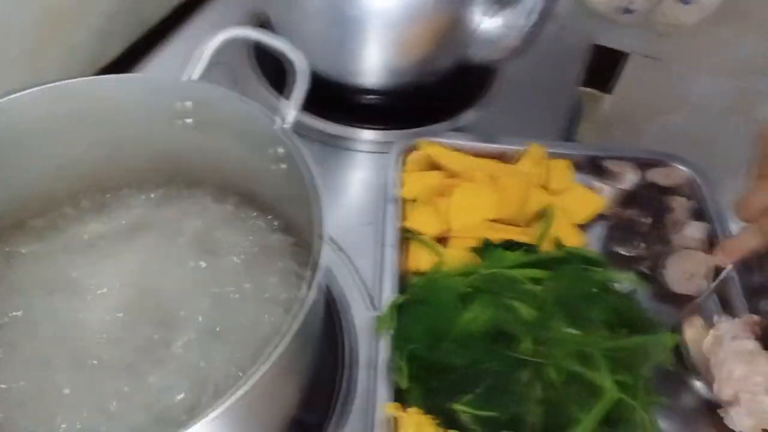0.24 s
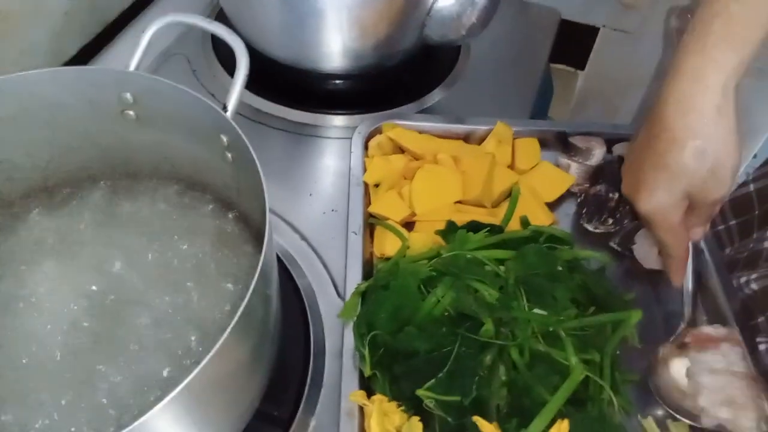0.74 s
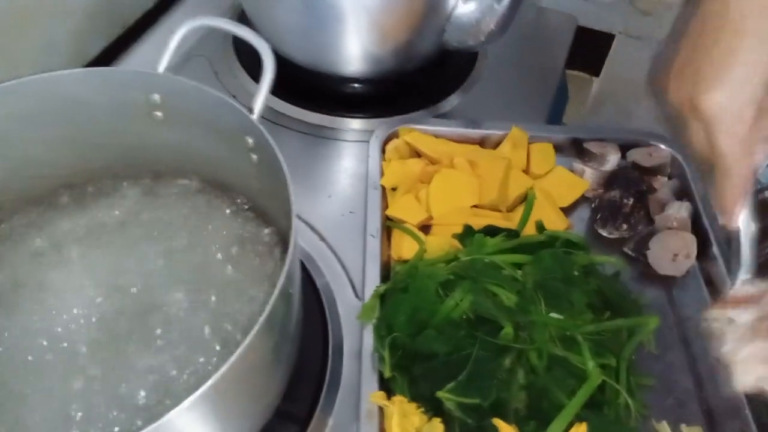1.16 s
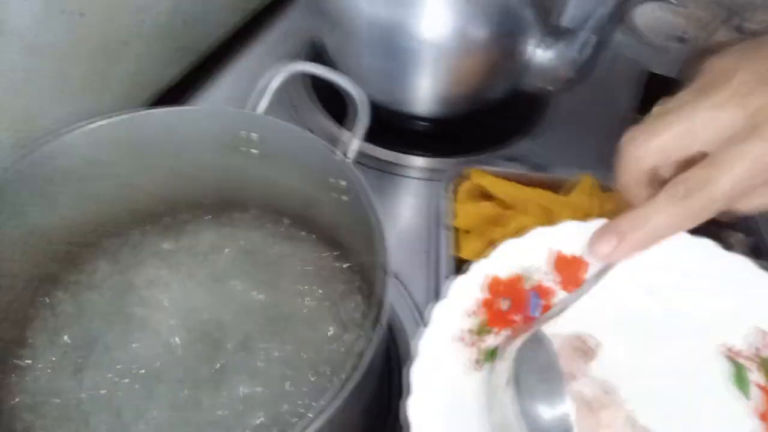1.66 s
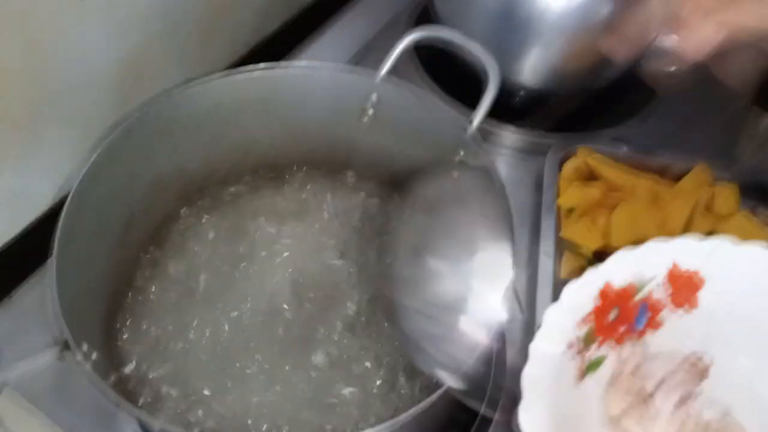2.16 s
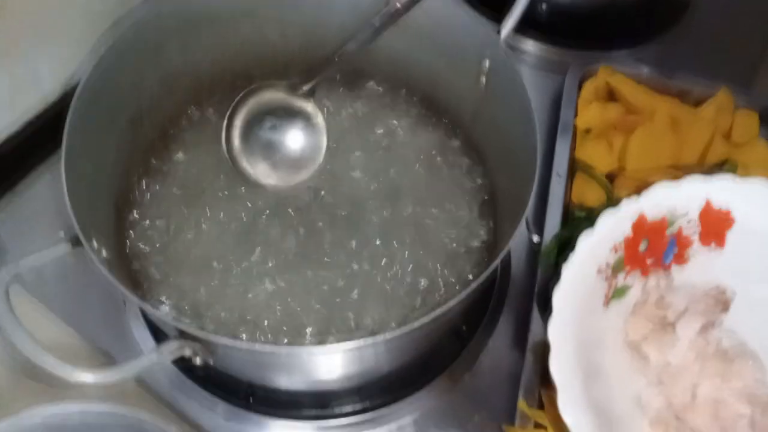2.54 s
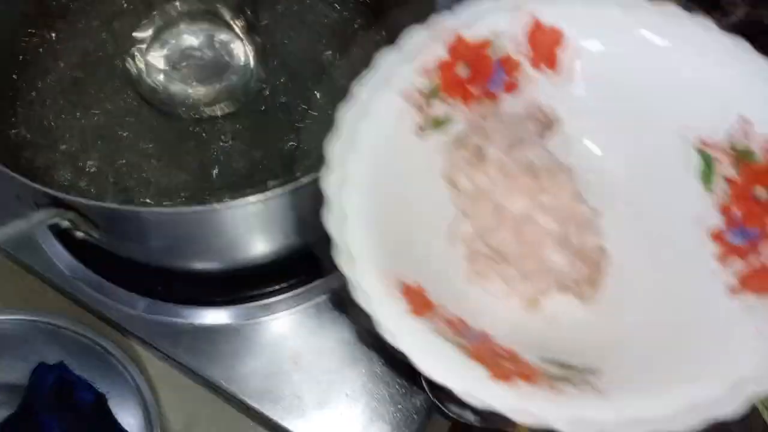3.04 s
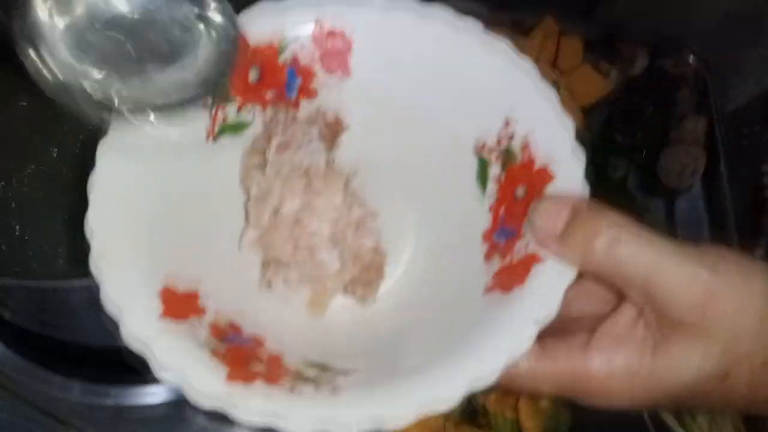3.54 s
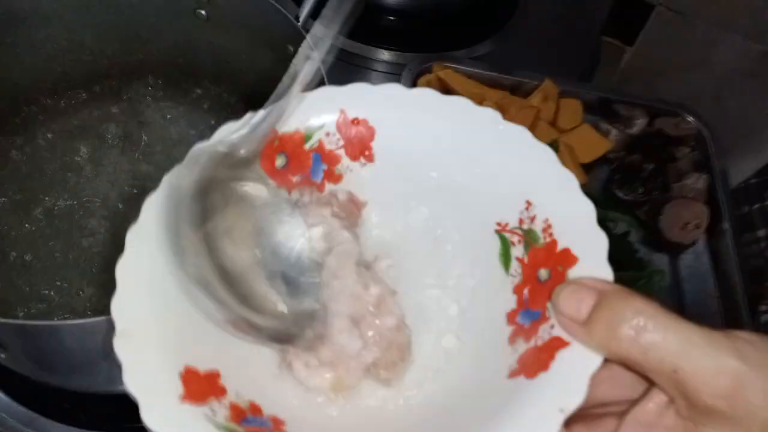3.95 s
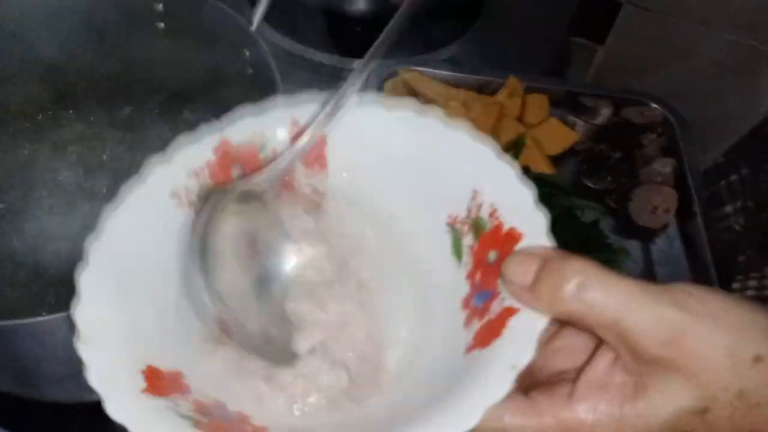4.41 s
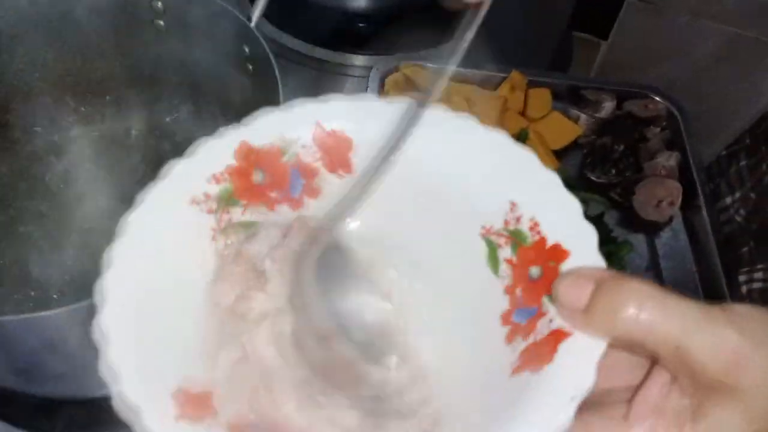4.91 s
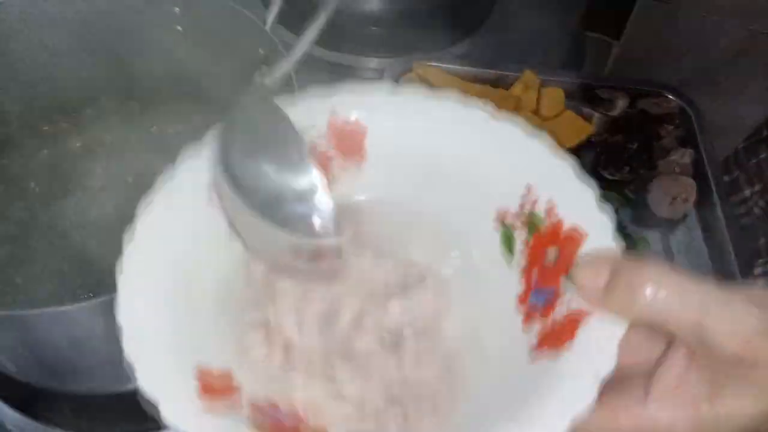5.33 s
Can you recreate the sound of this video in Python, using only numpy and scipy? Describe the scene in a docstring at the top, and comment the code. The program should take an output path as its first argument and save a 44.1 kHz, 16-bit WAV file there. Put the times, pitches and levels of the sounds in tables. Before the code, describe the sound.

Over a steady bubbling simmer, a spoon knocks a tray, clinks and scrapes meat into a bowl, then a ladle gulps and clangs on a pot.

```python
"""Small, hard-walled kitchen: soup simmers in an aluminium pot while a spoon and a ladle are at work.
The spoon knocks a steel tray, then clinks, scrapes and squeals meat into a bowl. The ladle gulps and
bumps under broth, clangs on the pot wall and stirs. Blows ring dying modes plus a noise crack; slips
drive resonances; bubbles and air pockets are gliding sines; hiss and rumble are coloured noise.
Dense echoes, one close microphone with noise suppressor, two equal channels."""
import sys
import numpy as np
from scipy import signal
from scipy.fft import rfft, irfft
from scipy.io import wavfile
from scipy.ndimage import uniform_filter1d

SR = 44100
rng = np.random.default_rng(int(sys.argv[2]) if len(sys.argv) > 2 else 0)


def digitize_waveform(pressure):
    """Quantize a signal to 16-bit integers and store it at the path in sys.argv[1].

    Rows of a 2-D input are taken as channels; values are limited to [-1, 1].
    """
    field = np.atleast_2d(pressure).T
    bounded = np.clip(field, -1, 1)
    quanta = np.round(bounded * 32767).astype(np.int16)
    wavfile.write(sys.argv[1], SR, quanta)


N = 246078
TIME = np.arange(N) / SR


def amp(db):
    """Amplitude ratio from dB."""
    return 10 ** (np.asarray(db) / 20)


def unit_rms(x):
    """Scale to RMS 1."""
    return x / np.sqrt(np.mean(x ** 2) + 1e-20)


def unit_attack(x, size=441):
    """Scale so the first 10 ms have RMS 1."""
    return x / np.sqrt(np.mean(x[:size] ** 2) + 1e-20)


def noise(size=N):
    """White Gaussian noise."""
    return rng.standard_normal(size)


def decay(t_s, t60_s):
    """Exponential decay, 60 dB per t60."""
    return np.exp(-np.log(1000) * t_s / t60_s)


def sine(f_hz):
    """Sine following a pitch track."""
    return np.sin(2 * np.pi * np.cumsum(f_hz) / SR)


def spectrum_at(points, f_hz):
    """Spectrum interpolated linearly over log frequency."""
    f, value = np.transpose(points)
    return np.interp(np.log(f_hz + 1), np.log(f + 1), value)


def curve(points):
    """Time curve interpolated at every sample."""
    t, value = np.transpose(points)
    return np.interp(TIME, t, value)


def add(mix, start_s, sound):
    """Mix a sound in at its start, cut at the end of the mix."""
    part = mix[max(round(start_s * SR), 0):][:len(sound)]
    part += sound[:len(part)]


def colour(x, points, size=4096):
    """Causal minimum-phase filter with the given spectrum in dB."""
    f_hz = abs(np.fft.fftfreq(size, 1 / SR))
    log_gain = np.log(amp(spectrum_at(points, f_hz)))
    taps = np.fft.ifft(np.exp(np.conj(signal.hilbert(log_gain)))).real
    return signal.oaconvolve(x, taps[:size // 2])[:len(x)]


def resonate(x, f_hz, width_hz):
    """Fixed resonance with peak gain 1."""
    return signal.lfilter(*signal.iirpeak(f_hz, f_hz / width_hz, SR), x)


def wander(corner_hz, size=N):
    """Low-passed noise of RMS 1: a smooth random drift."""
    f_hz = np.fft.rfftfreq(size, 1 / SR)
    return unit_rms(irfft(rfft(noise(size)) / (1 + (f_hz / corner_hz) ** 4), size))


def clicks(rate_hz, spread_db):
    """Random clicks of either sign, mostly small, a few large; RMS 1."""
    size = amp(spread_db * np.minimum(rng.exponential(1, N), 5))
    sign = rng.choice([-1, 1], N)
    return unit_rms(size * sign * (rng.random(N) < rate_hz / SR))


def ring(modes, shiver_rad=0, shiver_hz=45):
    """One second of dying modes; an optional phase shiver unsettles high modes more."""
    t, out = TIME[:SR], np.zeros(SR)
    for k, (f_hz, db, t60_s) in enumerate(modes):
        shiver = np.zeros(SR)
        if shiver_rad:
            shiver = shiver_rad * f_hz / (f_hz + 500) * wander(shiver_hz, SR)
        tone = np.sin(2 * np.pi * f_hz * t + shiver - shiver[0])
        out += (-1) ** k * amp(db) * decay(t, t60_s) * tone
    return out


def blows(hits, modes, crack_colour, crack_t60_s, shiver_rad=0):
    """Each blow rings the modes and adds a fast-dying noise crack for the dense overtones."""
    out = np.zeros(N)
    for start_s, db, crack_db in hits:
        tone = unit_attack(ring(modes, shiver_rad))
        crack = colour(noise(SR) * decay(TIME[:SR], crack_t60_s), crack_colour)
        blow = unit_attack(tone + amp(crack_db) * unit_attack(crack))
        add(out, start_s, amp(db) * blow)
    return out


# all hit tables: t/s, level over first 10 ms/dB, crack re ring/dB
TRAY_HITS = [(.2698, -22, -2.5)]
# steel tray modes: f/Hz, relative level/dB, t60/s
TRAY_MODES = [(527, -26, 0.36), (760, -4, 0.013), (910, -15, 0.02), (1216, -23, 0.29), (1225, -8.5, 0.025),
              (1424, -31.5, .4), (1840, -2.5, 0.013), (2540, -11, 0.009), (2820, -1.5, 0.0092),
              (3600, 1.5, 0.0068), (4060, -5.5, 0.02), (4580, 0.5, 0.0067), (5700, -8, 0.018),
              (7520, -7.5, 0.013)]
# tray crack spectrum: f/Hz, level/dB
TRAY_CRACK_COLOUR = [(35, -3), (100, -9), (160, 3.5), (320, 5.5), (430, 5), (600, 4), (1000, 9.5),
                     (2300, 0), (3600, 0.5), (8000, -4), (14000, -15.5)]


def tray_knock():
    """Spoon on steel tray: short bright modes with a crack."""
    return blows(TRAY_HITS, TRAY_MODES, TRAY_CRACK_COLOUR, crack_t60_s=0.052, shiver_rad=0.5)


# whole-tray flexing modes: f/Hz, level/dB, t60/s
TRAY_FLEX_MODES = [(225, -34, 0.56), (233, -42, .3), (300, -48, .7), (338, -45.5, 0.62), (377, -51, 0.33)]


def tray_hum():
    """The knock sets the loaded tray flexing in a low, unsteady hum."""
    out = np.zeros(N)
    add(out, TRAY_HITS[0][0], ring(TRAY_FLEX_MODES, shiver_rad=1.0))
    return out


# spoon on bowl: t/s, level over first 10 ms/dB, crack re ring/dB
BOWL_HITS = [(.412, -45.5, 6), (1.323, -50.5, -5), (1.5464, -25, -5), (1.5578, -43, 10), (1.5655, -42, 2),
             (1.612, -34, 6), (1.6255, -40, -4), (1.6372, -33.5, 6), (1.6465, -34, 8), (1.6765, -39.5, 13),
             (1.9158, -37.5, 4), (3.201, -53.5, -7)]
# bowl modes: f/Hz, relative level/dB, t60/s
BOWL_MODES = [(1400, -21, 0.069), (2920, -17.5, 0.3), (3040, -14.5, .2), (3130, -10.5, 0.26),
              (3270, -15, .16), (3436, 3.5, 0.029), (3940, -16, 0.11), (4027, 4, 0.035), (4040, -21, 0.2),
              (4500, -11, .15), (4640, -23, .22), (5720, 6.5, 0.013), (6100, -8, 0.012),
              (7240, -4.5, 0.025), (13500, -9, 0.018)]
# crack spectrum, bowl clinks and spoon knocks: f/Hz, level/dB
BOWL_CRACK_COLOUR = [(60, -41), (200, -11), (400, -8), (1000, -1), (3300, 4), (7000, -3.5), (14000, -12.5)]


def bowl_clinks():
    """Spoon on bowl: high modes with a bright crack."""
    return blows(BOWL_HITS, BOWL_MODES, BOWL_CRACK_COLOUR, crack_t60_s=0.02, shiver_rad=0.71)


# ladle on pot wall: t/s, level over first 10 ms/dB, crack re ring/dB
CLANG_HITS = [(3.2903, -24.5, -4)]
# aluminium pot modes: f/Hz, relative level/dB, t60/s
POT_MODES = [(166, -11, .27), (222, -4.5, .36), (240, -7.5, .28), (390, -12, .2), (428, -10, .28),
             (528, -16, .35), (646, -11, .3), (690, -13, .25), (764, -13, .26), (824, -5.5, .25),
             (947, -16, .26), (1071, -8, .23), (1190, -7, .22), (1222, 0, .26), (1346, -5.5, .29),
             (1444, -6.5, .3), (1604, -6.5, .28), (1838, -4, .16), (1988, -18, .26), (2600, -13, .22),
             (2728, -6, .25), (3058, -16, .28), (3236, -15, .26), (3517, -11, .27), (3637, -8, .28),
             (3698, -13, .3), (3935, -13, .22), (4440, -19, .23), (5480, -19, .18)]
# crack spectrum of pot clang, rattle and low knock: f/Hz, level/dB
POT_CRACK_COLOUR = [(50, -28), (100, -13), (160, 1), (230, 7), (400, -2), (850, 5.5), (1400, -4),
                    (2200, -5), (3600, -3.5), (7000, -7.5), (14000, -27)]


def pot_clang():
    """Ladle on pot wall: many long modes, their phases unsettled by chatter."""
    return blows(CLANG_HITS, POT_MODES, POT_CRACK_COLOUR, crack_t60_s=0.068, shiver_rad=0.58)


def ladle_rattle(start_db=-32.5, t60_s=0.34):
    """After the clang the ladle chatters on the wall in ever smaller ticks."""
    out = np.zeros(N)
    ticks = colour(clicks(rate_hz=490, spread_db=1.0)[:SR], POT_CRACK_COLOUR)
    add(out, CLANG_HITS[0][0], amp(start_db) * unit_rms(ticks) * decay(TIME[:SR], t60_s))
    return out


# dull low knock: t/s, level over first 10 ms/dB, crack re ring/dB
THUD_HITS = [(3.3145, -31, -4.5)]
# dull knock modes: f/Hz, relative level/dB, t60/s
THUD_MODES = [(135, -6, 0.048), (180, -1, 0.056), (253, 0, 0.082), (394, -8, .03)]


def thud():
    """A dull low knock follows just after the clang."""
    return blows(THUD_HITS, THUD_MODES, POT_CRACK_COLOUR, crack_t60_s=0.02)


# ladle on pot under broth: t/s, level over first 10 ms/dB, crack re ring/dB
BUMP_HITS = [(2.6718, -32.5, -3.5)]
# broth-damped pot modes: f/Hz, relative level/dB, t60/s
DAMPED_POT_MODES = [(161, -24, 0.19), (370, -7.5, 0.031), (608, 0.5, 0.024), (910, -11, 0.029),
                    (1060, -4, 0.022), (1630, -26, 0.025)]
# crack spectrum under broth: f/Hz, level/dB
BROTH_CRACK_COLOUR = [(100, -12), (400, 3), (1000, 7), (3000, 2), (7000, 10), (10000, 1.5), (15000, -4)]


def pot_bump():
    """Ladle bumps the pot under broth: mostly short, damped modes with a longer crack."""
    return blows(BUMP_HITS, DAMPED_POT_MODES, BROTH_CRACK_COLOUR, crack_t60_s=0.15)


def stroke(start_s, length_s, swell_db, attack_s=0.0031, release_s=0.0059):
    """Pressure of a stroke or escape: quick attack, hold that swells or eases, quick release."""
    t = TIME - start_s
    # hold runs from -1.5 to -0.5 times the swell
    hold = amp(swell_db * (np.clip(t / length_s, 0, 1) - 1.5))
    release = np.exp(-np.maximum(t - length_s, 0) / release_s)
    return np.clip(t / attack_s, 0, 1) * hold * release


# spoon over bowl: t/s, length/s, metal level before swell/dB, swell/dB, edge grit re spoon ring/dB,
# meat push level before swell/dB
SCRAPE_STROKES = [(1.549, 0.076, -52.5, -4.5, 19, -58), (1.618, 0.012, -43.5, -2, 11, -44.5),
                  (1.638, 0.039, -36, -2.5, 7, -44.5), (1.684, 0.044, -37, 1, -6, -75),
                  (1.734, 0.043, -48, -0.5, -10, -80), (1.787, 0.0465, -38.5, 1.5, -3.5, -76),
                  (1.841, 0.021, -34, 0, -5.5, -80), (1.873, 0.038, -39, 8.5, -5, -78)]
# pressed spoon resonances: f/Hz, width/Hz, relative level/dB
SPOON_RESONANCES = [(1160, 126, 0), (1410, 98, -15), (2000, 300, -4.5), (3150, 180, -3), (4170, 130, -7),
                    (4850, 76, 2), (7300, 250, -26)]


def scrape(judder_db=1.5):
    """Tiny slips of the edge drive spoon and bowl while meat slides off as soft low noise."""
    slips = clicks(rate_hz=2200, spread_db=2.0) * amp(judder_db * wander(90))
    spoon = np.zeros(N)
    for f_hz, width_hz, db in SPOON_RESONANCES:
        spoon += amp(db) * resonate(slips, f_hz, width_hz)
    # spectra: f/Hz, level/dB
    spoon = colour(unit_rms(spoon), [(250, -19.0), (800, 1.5), (7000, -7), (12000, -24)])
    edge = colour(slips, [(200, -25.0), (800, 9.5), (3300, 1.5), (7000, -0.5), (14000, -12.5)])
    meat = colour(noise(), [(60, -19), (200, -9.0), (500, -7.5), (1500, -22.5)])
    spoon, edge, meat = unit_rms(spoon), unit_rms(edge), unit_rms(meat)
    out = np.zeros(N)
    for start_s, length_s, db, swell_db, grit_db, push_db in SCRAPE_STROKES:
        metal = (spoon + amp(grit_db) * edge) / np.hypot(1, amp(grit_db))
        out += stroke(start_s, length_s, swell_db) * (amp(db) * metal + amp(push_db) * meat)
    return out


# spoon edge on glaze: t/s, length/s, level before flutter/dB, first f/Hz, last f/Hz
SQUEAL_STROKES = [(1.699, 0.041, -43, 1130, 1070), (1.785, 0.0434, -37.5, 1150, 1055),
                  (1.834, 0.011, -38, 964, 968)]


def squeals(jitter=0.025, flutter_db=2.5, overtone_db=-14):
    """The edge sticks and slips in step with the spoon's lowest ring: jittery tone plus octave."""
    out = np.zeros(N)
    waver, flutter = 1 + jitter * wander(317), amp(flutter_db * wander(110))
    for start_s, length_s, db, first_hz, last_hz in SQUEAL_STROKES:
        f_hz = np.interp(TIME, [start_s, start_s + length_s], [first_hz, last_hz]) * waver
        tone = sine(f_hz) + amp(overtone_db) * sine(2 * f_hz)
        out += amp(db) * stroke(start_s, length_s, 0) * tone
    return out * flutter


# spoon on bowl through meat: t/s, level over first 10 ms/dB, crack re ring/dB
SPOON_HITS = [(1.6385, -31.5, -14), (1.666, -39, 5), (1.6855, -41, 10), (1.8165, -47, 11), (1.8485, -50, 3),
              (1.856, -47, -11), (1.8932, -36, -10)]
# spoon modes: f/Hz, relative level/dB, t60/s
SPOON_MODES = [(1090, -4.5, 0.019), (1390, -5.5, 0.011), (2040, -14, 0.017), (4120, -11, 0.028),
               (4900, -16, 0.056)]


def spoon_knocks():
    """Spoon knocked on the bowl through meat: short dull modes."""
    return blows(SPOON_HITS, SPOON_MODES, BOWL_CRACK_COLOUR, crack_t60_s=0.017)


def gulp(wobble=0.04, flutter_db=1.8):
    """An air pocket under the sinking ladle rings lower as it grows."""
    out, t = np.zeros(N), TIME[:SR]
    start_hz, end_hz, fall_s = 429, 188.6, 0.0207
    f_hz = end_hz + (start_hz - end_hz) * np.exp(-t / fall_s)
    f_hz = f_hz * (1 + wobble * wander(90)[:SR])
    level = amp(-34 + flutter_db * wander(80)[:SR])
    swell = 1 - np.exp(-t / 0.0061)
    add(out, 2.669, level * swell * decay(t, 0.39) * sine(f_hz))
    return out


def pocket_escape(start_s=2.755, length_s=0.11, level_db=-56.5, wobble=0.097, flutter_db=2.7):
    """The pocket escapes and rings higher as it nears the surface."""
    f_hz = np.interp(TIME, [start_s, start_s + length_s], [347, 592]) * (1 + wobble * wander(83))
    level = amp(level_db + flutter_db * wander(60))
    return stroke(start_s, length_s, 0) * level * sine(f_hz)


# air in pot: f/Hz, level/dB, t60/s
DRIP_MODE = [(660, -45.5, 0.15)]


def plop(start_s=3.023):
    """A drip off the lifted ladle rings the air in the pot."""
    out = np.zeros(N)
    add(out, start_s, ring(DRIP_MODE))
    return out


# ladle on bowl: t/s, level over first 10 ms/dB, crack re ring/dB
TAP_HITS = [(3.572, -57, -2), (3.765, -54, 4), (3.8372, -49, -6), (4.004, -58, 3), (4.0118, -46.5, -3),
            (4.7195, -67, 6), (4.879, -52.5, 5.5), (5.117, -51.5, -1.5)]
# broth-damped bowl modes: f/Hz, relative level/dB, t60/s
WET_BOWL_MODES = [(1270, -11, 0.017), (1880, -1.5, 0.024), (2430, 4, 0.01), (3240, 1, 0.033),
                  (4030, -14, 0.018)]
# wet crack spectrum: f/Hz, level/dB
WET_CRACK_COLOUR = [(100, -22), (800, -27), (2200, -1), (4500, 7), (8000, -4), (14000, -11)]


def ladle_taps():
    """Ladle taps the bowl, its modes damped by broth."""
    return blows(TAP_HITS, WET_BOWL_MODES, WET_CRACK_COLOUR, crack_t60_s=0.048)


# broth under ladle: t/s, length/s, level/dB, bubble f/Hz, pitch spread 0-1
SLOSH_EVENTS = [(1.032, .17, -58.5, 2020, 0.29), (3.55, 0.084, -59, 1670, 0.1),
                (3.686, 0.18, -60, 1620, 0.37), (3.996, 0.09, -61.5, 2390, 0.44),
                (4.457, 0.041, -53.5, 1230, 0.04), (4.464, .09, -63.5, 900, 0.3),
                (4.56, 0.055, -67, 2170, 0.44), (5.5, 0.1, -58, 3040, 0.2)]


def sloshes(decay_cycles=4, glide=0.023, count=120):
    """Each slosh is a cluster of small bubbles that rise in pitch as they die."""
    out, t = np.zeros(N), TIME[:SR // 20]
    for start_s, length_s, db, pitch_hz, spread in SLOSH_EVENTS:
        cluster = np.zeros(SR // 2)
        onset = rng.beta(2, 2, count) * length_s
        size = rng.uniform(-0.82, 1, count)
        bubble_hz = pitch_hz * np.exp(2 * spread * rng.uniform(-0.965, 1, count))
        for k in range(count):
            cycles = bubble_hz[k] * t
            age = cycles / decay_cycles
            bubble = np.exp(-age) * np.sin(2 * np.pi * cycles * (1 + glide * age / 2))
            add(cluster, onset[k], size[k] * bubble)
        cluster_rms = np.sqrt(np.sum(cluster ** 2) / (length_s * SR))
        add(out, start_s, amp(db) * cluster / cluster_rms)
    return out


def patchy(x, patch_db=1.45, patch_bins=7, patch_frames=14):
    """Bubbles burst in clumps: small time-frequency patches swell and sink on their own."""
    z = signal.stft(x, nperseg=1024, noverlap=768)[2]
    patches = uniform_filter1d(noise(z.shape), patch_bins, 0)
    patches = uniform_filter1d(patches, patch_frames, 1)
    z = z * amp(patch_db * unit_rms(patches))
    return signal.istft(z, nperseg=1024, noverlap=768)[1][:N]


# simmer strength: t/s, fizz level before flicker/dB
FIZZ_LEVEL = [(0, -52), (.8, -53), (1.15, -51.5), (2.2, -53), (2.6, -50), (3.1, -53.5), (3.55, -53.5),
              (3.9, -51.5), (4.25, -53.5), (4.8, -52.5), (5.2, -54), (5.58, -53)]
# fizz spectrum: f/Hz, level/dB
FIZZ_COLOUR = [(400, -23.5), (900, -9), (1500, 1.5), (2400, 6), (3200, 5.5), (4500, 3.5), (7000, 2.5),
               (15000, -11.5)]


def fizz(pops_db=-11, flicker_db=0.76):
    """Countless small bubbles burst: patchy coloured noise with pops."""
    bubbles = noise() + amp(pops_db) * clicks(rate_hz=510, spread_db=1.5)
    hiss = unit_rms(patchy(colour(bubbles, FIZZ_COLOUR)))
    return amp(curve(FIZZ_LEVEL) + flicker_db * wander(30)) * hiss


# air over broth, low then upper note: f/Hz, width of each of two passes/Hz
POT_AIR_NOTES = [(641, 81), (1220, 226)]
# low air note: t/s, level before throb/dB
LOW_NOTE_LEVEL = [(0.0, -67.5), (0.37, -71), (0.57, -74.5), (1.15, -71.5), (1.55, -65), (1.69, -60),
                  (2.14, -63.5), (2.58, -58.5), (2.89, -63), (3.11, -72), (3.53, -63.5), (3.81, -70.5),
                  (4.2, -75), (5.27, -73.5), (5.49, -66.5), (5.58, -70)]


def pot_air(upper_re_fizz_db=-9, throb_db=1.56):
    """Air in the pot hums at two notes: noise through doubled resonances."""
    out = np.zeros(N)
    levels_db = curve(LOW_NOTE_LEVEL), curve(FIZZ_LEVEL) + upper_re_fizz_db
    for (f_hz, width_hz), level_db in zip(POT_AIR_NOTES, levels_db):
        note = resonate(resonate(noise(), f_hz, width_hz), f_hz, width_hz)
        out += amp(level_db + throb_db * wander(10.3)) * unit_rms(note)
    return out


def whistle(start_s=0.9, length_s=2.18, level_db=-60.5, waver_hz=7, flutter_db=3.0):
    """A thin unsteady stove whistle swells and fades in one arch while its pitch sags."""
    t = np.clip(TIME - start_s, 0, length_s)
    sag_hz_per_s = 18
    f_hz = 1760 - sag_hz_per_s * t + waver_hz * wander(53)
    arch = np.sqrt(abs(np.sin(np.pi * t / length_s)))
    return arch * amp(level_db + flutter_db * wander(16)) * sine(f_hz)


# rumble spectrum: f/Hz, level/dB
RUMBLE_COLOUR = [(20, -32), (70, 8), (120, -1), (220, 3), (330, -6), (500, -8), (1000, -5), (3000, -62)]


def rumble(level_db=-66.5):
    """Steady low background: coloured noise."""
    return amp(level_db) * unit_rms(colour(noise(), RUMBLE_COLOUR))


# echo decay: f/Hz, t60/s
ECHO_T60 = [(100, 0.56), (220, 0.25), (500, 0.45), (1500, 0.58), (4000, 0.74), (8000, 0.44), (15000, 0.36)]
# echo spectrum: f/Hz, level/dB
ECHO_COLOUR = [(60, -30), (160, 16), (230, 12.5), (310, 3.5), (430, 6), (700, 6.5), (3000, 2), (14000, 3.5)]
# standing waves: f/Hz, relative level/dB, t60/s
STANDING_WAVES = [(163.5, -0.5, 0.37), (222, -9, 0.17), (294, -6.5, 0.43), (331, -5, 0.36)]


def kitchen(x, build_s=0.022, modes_db=-19):
    """Dense wall echoes build up and die band by band, with a few standing waves."""
    f_hz, t, z = signal.stft(noise(SR), SR, nperseg=256)
    gain = amp(spectrum_at(ECHO_COLOUR, f_hz))[:, None]
    z = z * gain * decay(t, spectrum_at(ECHO_T60, f_hz)[:, None])
    tail = signal.istft(z, SR, nperseg=256)[1][:SR] * (1 - np.exp(-TIME[:SR] / build_s))
    response = unit_rms(tail) + amp(modes_db) * unit_rms(ring(STANDING_WAVES))
    return signal.fftconvolve(x, response / np.sqrt(SR))[:N]


def dip(start_s=1.532, length_s=0.013, depth_db=-10):
    """Gain that drops briefly just before the loudest clink."""
    inside = (TIME > start_s) & (TIME < start_s + length_s)
    return amp(depth_db * uniform_filter1d(inside.astype(float), size=64))


def scene():
    """Sum of direct sounds, their echoes and the background, in two equal channels."""
    tray, bowl, bump = tray_knock(), bowl_clinks(), pot_bump()
    clang = pot_clang() + ladle_rattle() + thud()
    stirring = scrape() + squeals() + spoon_knocks()
    stirring += gulp() + pocket_escape() + plop() + ladle_taps() + sloshes()
    to_room = amp(-7.0) * tray + amp(-7.0) * bowl + amp(-11.5) * clang
    to_room += amp(-6.0) * bump + amp(-16.5) * stirring
    struck = tray + tray_hum() + bowl + clang + bump
    background = fizz() + pot_air() + whistle() + rumble()
    mono = struck + stirring + kitchen(to_room) + background
    return np.array([mono, mono]) * dip()


# suppressor depth: f/Hz, cut/dB (negative lifts)
SUPPRESSOR_CUT = [(100, 5.5), (400, 4.5), (900, 5.5), (1250, 2), (1600, 2), (2400, 3), (7000, 0),
                  (9300, 3.5), (11400, 5.5), (13000, -2.5)]


def suppress(x, smooth_bins=6, smooth_frames=11, knee_db=1.5, soft_db=1.3):
    """Noise suppressor: bands near their floor are turned down, so tails end early."""
    f_hz, _, z = signal.stft(x, SR, nperseg=1024, noverlap=768)
    power = uniform_filter1d(abs(z) ** 2, smooth_bins, 0)
    power = abs(uniform_filter1d(power, smooth_frames, 1))
    level_db = 10 * np.log10(power + 1e-20)
    floor_db = np.percentile(level_db, 20, axis=1, keepdims=True)
    shut = 0.5 - 0.5 * np.tanh((level_db - floor_db - knee_db) / (2 * soft_db))
    z = z * amp(-spectrum_at(SUPPRESSOR_CUT, f_hz)[:, None] * shut)
    return signal.istft(z, SR, nperseg=1024, noverlap=768)[1][:N]


# microphone response: f/Hz, level/dB
MICROPHONE_RESPONSE = [(20, -24), (70, -8.5), (150, 0), (5800, 1), (6750, 9.5), (7600, 1.5), (8400, -5),
                       (9250, -15.5), (10500, -8), (11400, -9), (12500, 1), (15500, 6.5)]


def record(dry):
    """Microphone port resonance and treble hollow, noise suppressor, then band limit."""
    heard = np.array([suppress(colour(channel, MICROPHONE_RESPONSE)) for channel in dry])
    edge_hz = 15750
    low_pass = signal.firwin(511, edge_hz, window=("kaiser", 9), fs=SR)
    return signal.oaconvolve(heard, low_pass[None], "same")


dry = scene()
out = record(dry)
digitize_waveform(out)
```